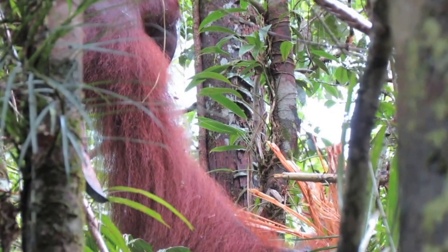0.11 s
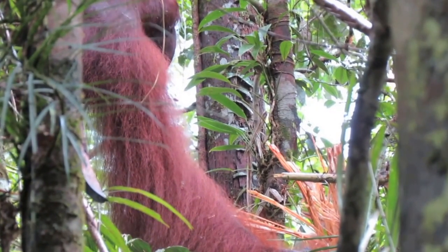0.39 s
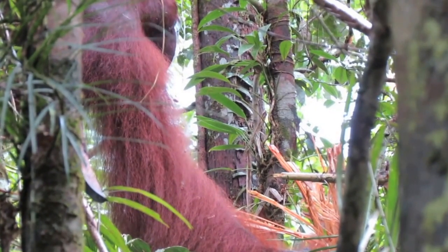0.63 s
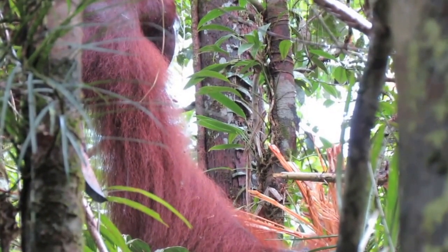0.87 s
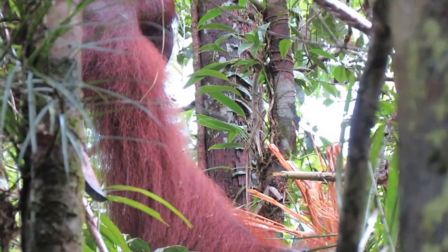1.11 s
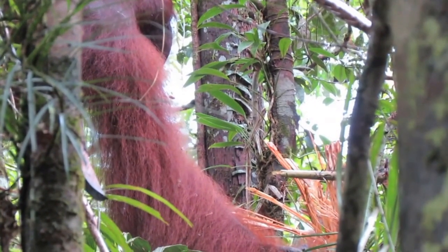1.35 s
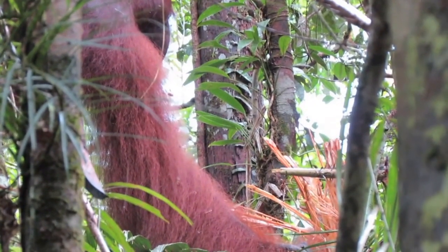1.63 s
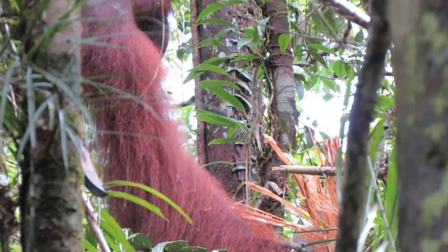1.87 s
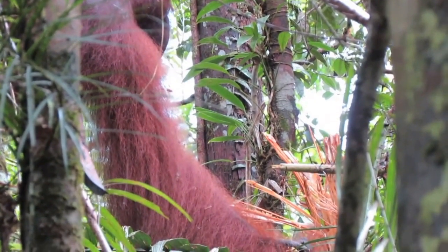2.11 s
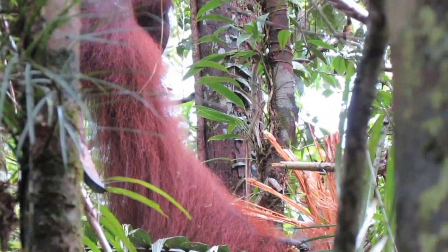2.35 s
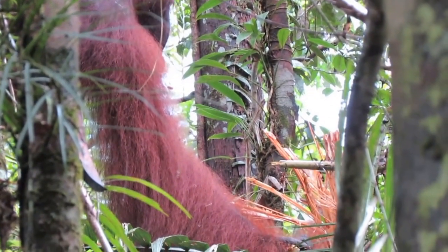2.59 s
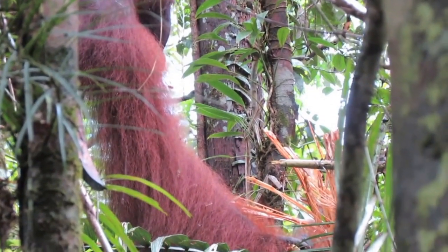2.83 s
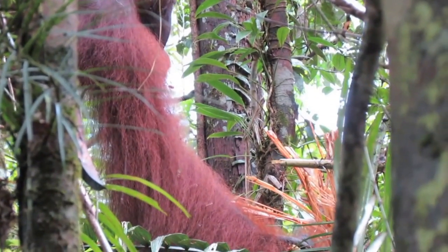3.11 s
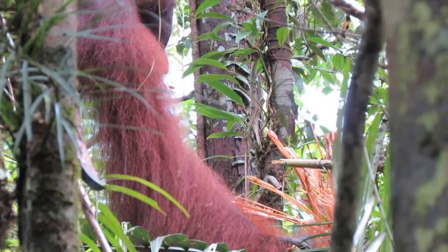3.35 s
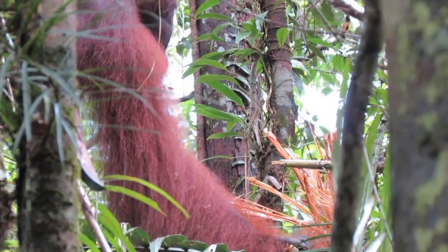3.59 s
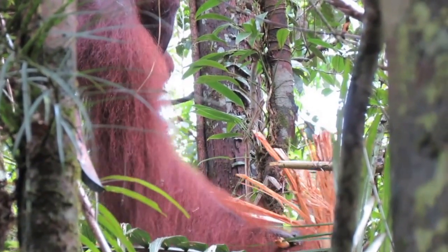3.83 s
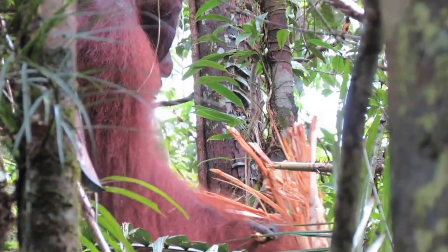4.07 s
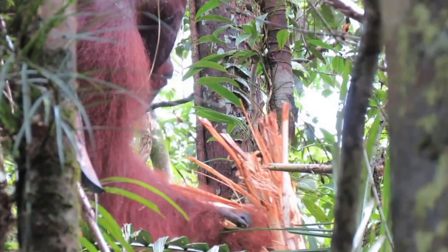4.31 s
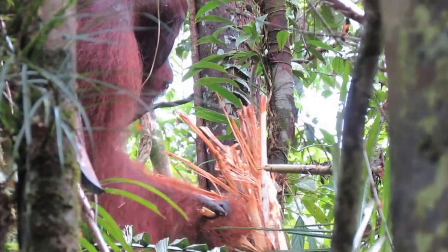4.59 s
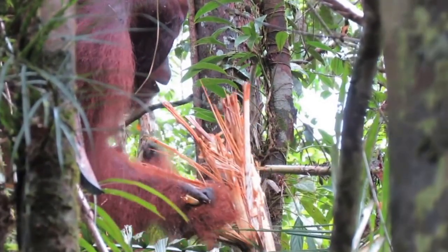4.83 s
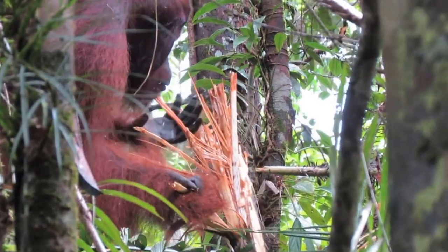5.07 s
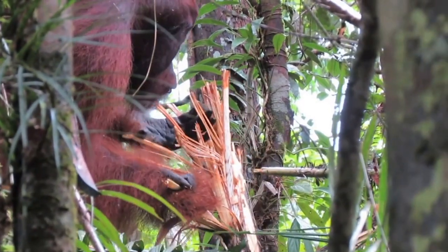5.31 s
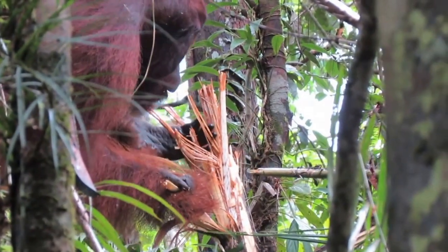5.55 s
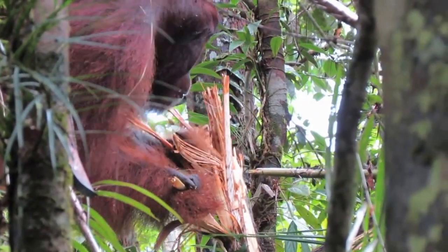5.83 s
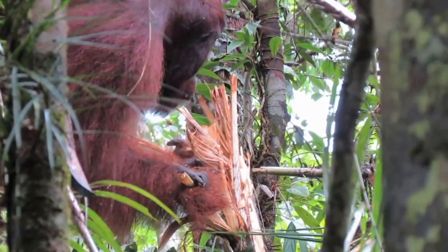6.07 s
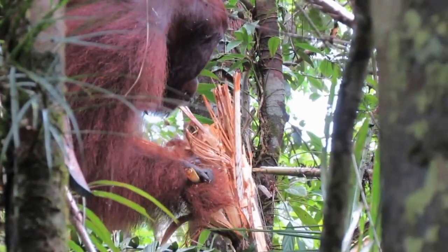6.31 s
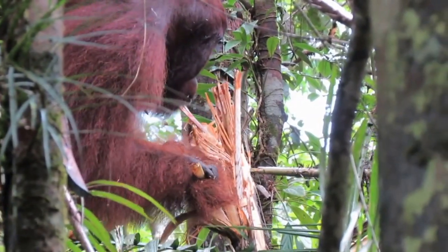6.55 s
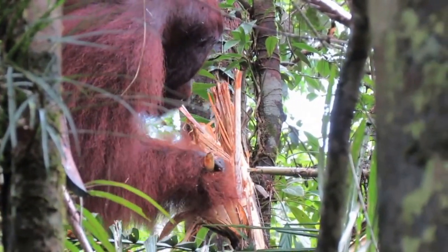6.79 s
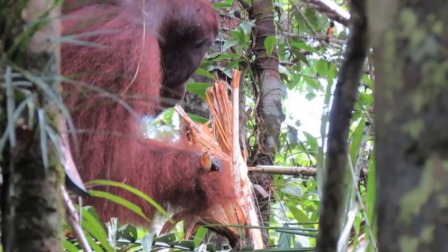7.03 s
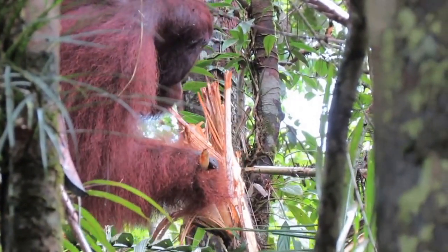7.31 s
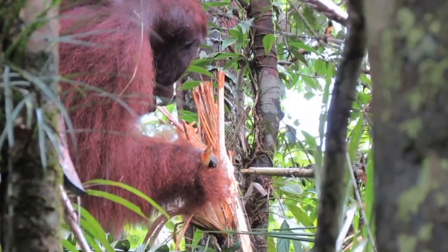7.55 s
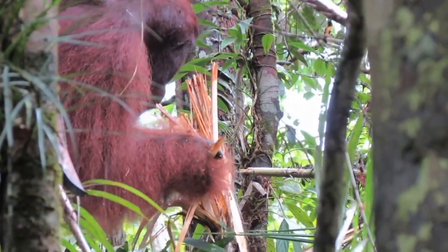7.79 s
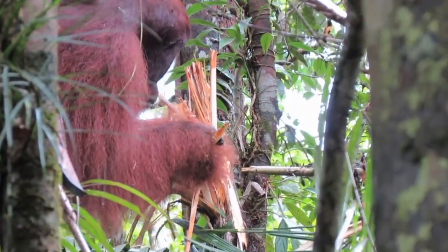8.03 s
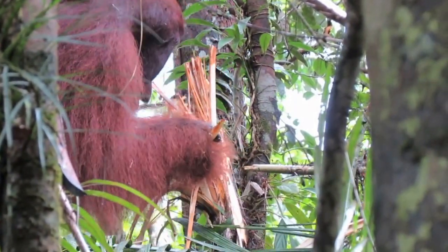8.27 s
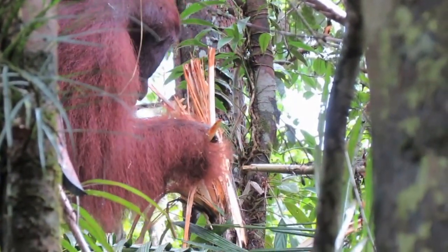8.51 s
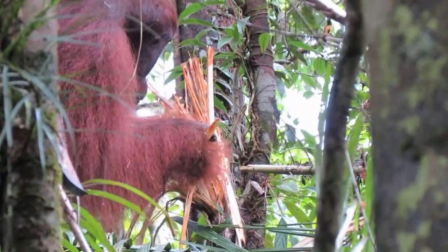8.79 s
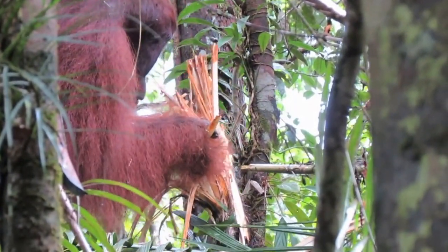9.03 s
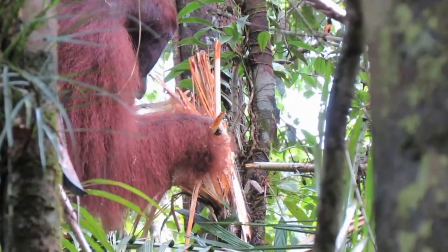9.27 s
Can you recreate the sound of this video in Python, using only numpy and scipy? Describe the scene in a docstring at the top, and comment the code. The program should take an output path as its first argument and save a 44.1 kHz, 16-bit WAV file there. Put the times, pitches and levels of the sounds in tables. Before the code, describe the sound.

Outdoors in a tropical forest, a steady shrill wall of cicadas and crickets rings wide around the microphone. Near cicadas start one after another, each throbbing whistle climbing slightly and holding. Very high chirps repeat about every two seconds. Early on, a cluster of dry fibre snaps clicks close by as an ape handles a split stem; leaves rustle softly around the middle, with one late click.

```python
"""A tropical forest by day: a few near cicadas wind their whistles up over a far chorus of many more.
Leaves scatter the songs, so tones fade and swell differently at left and right; singers are gliding sines
with echoes or narrow wandering tones, and the wash, leaves and far choruses are shaped random spectra.
An ape nearby picks at a split stem: dry fibres click and creak, and leaves rustle."""
import sys
import numpy as np
from scipy import signal
from scipy.io import wavfile
from scipy.ndimage import uniform_filter1d

SR = 44100
rng = np.random.default_rng(int(sys.argv[2]) if len(sys.argv) > 2 else 0)


def gain_from_decibels(decibels):
    """Convert decibel values to linear amplitude factors."""
    exponent = np.asarray(decibels, float) / 20
    return 10 ** exponent


def dump(signal):
    """Clip the signal to [-1, 1] and save it as 16-bit WAV at the path in sys.argv[1]."""
    limited = np.clip(np.atleast_2d(signal).T, -1, 1)
    pcm = np.round(limited * 32767).astype(np.int16)
    wavfile.write(sys.argv[1], SR, pcm)


N = 414080
T = np.arange(N) / SR
# the short-time spectra: time of each frame (s) and pitch of each bin (Hz)
FRAME_T = np.arange(N // 256 + 5) * 256 / SR
BIN_HZ = np.fft.rfftfreq(1024, 1 / SR)


def evened(x):
    """Normalisation: scales to rms 1."""
    return x / np.sqrt(np.mean(abs(x) ** 2) + 1e-20)


def read(points, hz):
    """Log-frequency interpolation of a spectrum table."""
    f, value = np.transpose(points)
    return np.interp(np.log(hz + 1), np.log(f + 1), value)


def drift(count, span):
    """Smoothed noise: slow chance of rms 1 that changes over about span samples."""
    return evened(uniform_filter1d(uniform_filter1d(rng.standard_normal(count), round(span)), round(span)))


def humps(t, rows):
    """Envelope superposition: flat-topped swells of (middle_s, half_width_s, level_db), as a factor."""
    return sum(gain_from_decibels(db) * np.exp(-((t - s) / width) ** 4) for s, width, db in rows)


def pair(z, same):
    """Interaural correlation: two unrelated draws become left and right of a given likeness (-1 to 1)."""
    same = np.clip(same, -1, 1)
    return np.array([z[0], same * z[0] + np.sqrt(1 - same ** 2) * z[1]])


def tone(hz, width_hz, same):
    """Multipath fading: a tone arrives by many leafy paths, its size and phase wandering within width_hz."""
    step = 64  # samples between path values
    count = len(hz) // step + 2
    z = rng.standard_normal((2, count)) + 1j * rng.standard_normal((2, count))
    fading = 1 / (1 + (np.fft.fftfreq(count, step / SR) / width_hz) ** 2)
    z = np.fft.ifft(np.fft.fft(z) * fading)
    at = np.arange(len(hz)) / step
    paths = np.array([np.interp(at, np.arange(count), p) for p in pair(evened(z), same)])
    carrier = np.exp(2j * np.pi * np.cumsum(hz) / SR)
    return np.sqrt(2) * (paths * carrier).real


def forest(x, direct, t60):
    """Reverberation: straight path plus trunk and leaf echoes; three sets take turns as the leaves sway."""
    t, direct = np.arange(SR // 2) / SR, np.clip(direct, 0, 1)
    echoes = rng.standard_normal((3, 2, len(t))) * gain_from_decibels(-60 * t / t60) * (t > .004)
    echoes *= np.sqrt(1 - direct) / np.linalg.norm(echoes[0, 0])
    # 1.1 turns a second; the squares of the three weights sum to 1
    turn = np.sqrt(2 / 3) * np.cos(2 * np.pi * (1.1 * T + np.arange(3)[:, None] / 3))
    scattered = signal.oaconvolve((turn * x)[:, None], echoes, axes=2).sum(0)[:, :N]
    return np.sqrt(direct) * x + scattered


def background():
    """Short-time spectral synthesis: wash, leaves and far choruses are random spectra with shared patches."""
    frames, bins = len(FRAME_T), len(BIN_HZ)
    z = 0
    for colour, swell, same in [wash(), *choruses(), wave_chorus(), leaves(), bout_chorus()]:
        re, im = rng.standard_normal((frames, bins, 2, 2)).T
        z = z + pair(re + 1j * im, same) * (colour / np.linalg.norm(colour))[:, None] * swell
    grain = rng.standard_normal((frames, bins)).T
    patches = evened(uniform_filter1d(uniform_filter1d(grain, 10, 0), 12, 1))
    # level patches of 0.84 dB rms
    return signal.istft(z * gain_from_decibels(0.84 * patches), nperseg=1024, noverlap=768)[1][:, :N]


# colour of the forest wash and the hiss of the microphone: pitch_hz, relative_density_db (per Hz)
WASH_COLOUR = [(18, -36), (30, -0.5), (80, 1.5), (300, 4), (1000, -3), (2100, -8.5), (2850, -3),
               (3100, 8.5), (3400, -4), (3600, -9), (4600, -7), (5300, 1.5), (6900, 3), (8300, -8),
               (9500, -1), (11500, -3.5), (12900, -2), (13500, -6), (16500, -27)]
# its stereo width: pitch_hz, left_right_likeness (-1 to 1)
WASH_LIKENESS = [(60, -0.83), (130, -0.7), (290, -0.79), (640, -0.56), (1410, -0.3), (3100, 0.15),
                 (6820, 0.3), (15000, -0.37)]


def wash():
    """Stationary noise: a steady layer of fixed colour whose left-right likeness varies with frequency."""
    return gain_from_decibels(read(WASH_COLOUR, BIN_HZ)), gain_from_decibels(-37.5), read(WASH_LIKENESS, BIN_HZ)[:, None]


def band_colour(low_hz, high_hz, edge_hz):
    """Band-limited spectrum: flat inside, falling exponentially outside, by a factor e every edge_hz."""
    outside = np.maximum(np.maximum(low_hz - BIN_HZ, BIN_HZ - high_hz), 0) / edge_hz
    return np.exp(-outside)


# far choruses too many to tell apart:
# low_hz, high_hz, edge_hz, left_right_likeness (clipped to -1..1), first_db, last_db, settling_s
FAR_CHORUSES = [(5675, 6657, 14, 0.19, -37.5, -36.5, 2.8), (6080, 6800, 38, 0.17, -46.5, -56, 8),
                (12310, 12645, 128, -0.21, -50.5, -40, 3.3), (5190, 5430, 63, 0.15, -44, -51.5, 2.4),
                (12702, 13122, 40, -1.3, -55, -54, 5)]


def choruses():
    """Incoherent summation: many singers fuse into bands of noise whose levels relax exponentially."""
    layers = []
    for low_hz, high_hz, edge_hz, same, first_db, last_db, settling_s in FAR_CHORUSES:
        swell = gain_from_decibels(last_db + (first_db - last_db) * np.exp(-FRAME_T / settling_s))
        layers.append((band_colour(low_hz, high_hz, edge_hz), swell, same))
    return layers


# crests of the highest chorus: crest_s, level_db
WAVE_CRESTS = [(.05, -42), (1.36, -41), (1.83, -42), (3.16, -42), (3.53, -41.5), (4.9, -40), (5.06, -42),
               (5.52, -44), (6.59, -41.5), (6.76, -43), (7.79, -41), (9.1, -45), (9.45, -41)]


def wave_chorus():
    """Asymmetric amplitude modulation: each wave of the highest chorus builds slowly and breaks off."""
    rest_db, build_db_per_s, break_db_per_s = -51, 16, 51
    waves_db = np.max([db - np.where(FRAME_T < s, build_db_per_s, break_db_per_s) * abs(FRAME_T - s)
                       for s, db in WAVE_CRESTS], axis=0)
    return band_colour(13200, 15897, edge_hz=300), gain_from_decibels(np.maximum(waves_db, rest_db)), 0


# colour of rustling leaves: pitch_hz, relative_density_db (per Hz)
LEAF_COLOUR = [(200, -12), (600, -1), (1400, 4.5), (2200, 0.5), (3800, 5), (5000, -1), (9000, -37)]
# their rustles: middle_s, half_width_s, level_db
LEAF_RUSTLES = [(.8, .4, -54.5), (4.2, .25, -52.5), (4.85, 0.53, -49), (7.9, 0.37, -56)]


def leaves():
    """Friction noise: leaves rustle in swells of coloured noise over a faint constant stir."""
    stir_db = -57
    return gain_from_decibels(read(LEAF_COLOUR, BIN_HZ)), gain_from_decibels(stir_db) + humps(FRAME_T, LEAF_RUSTLES), .1


# cicadas in a steady low cluster: pitch_hz, relative_level_db
DRONE_PARTIALS = [(3068, -7.5), (3108, -3.5), (3146, -1), (3176, -7.5), (3250, -17), (3290, -15)]
# their common effort: time_s, level_db
DRONE_EFFORT = [(0, -40), (1.1, -38.5), (2, -40.5), (4, -39), (6, -39.5), (7.6, -39), (9.39, -39)]


def drone():
    """Beating: the close lines of a steady low cicada interfere with each other."""
    lines = sum(gain_from_decibels(db) * tone(np.full(N, hz), width_hz=13.5, same=0.064) for hz, db in DRONE_PARTIALS)
    return gain_from_decibels(np.interp(T, *np.transpose(DRONE_EFFORT))) * evened(lines)


# colour of the buzzing insect: pitch_hz, relative_level_db
BUZZ_SPECTRUM = [(7800, -34), (8400, -27), (9000, -16), (9600, -2), (10300, 1), (10700, -10), (11400, -15),
                 (12000, -18)]


def buzz():
    """Harmonic comb: strong and weak pulses in turn give overtones of which every second is fainter."""
    spacing_hz, level_db = 177.5, -56
    order = np.arange(45, 68)
    order_db = read(BUZZ_SPECTRUM, order * spacing_hz) - 4.0 * (order % 2)
    return gain_from_decibels(level_db) * sum(gain_from_decibels(db) * tone(np.full(N, k * spacing_hz), width_hz=34, same=-0.59)
                               for k, db in zip(order, order_db))


# faint steady tones: pitch_hz, level_db, width_hz, left_right_likeness (-1 to 1)
FAINT_LINES = [(960, -63.5, 5.8, -0.68), (2491, -64, 21, 0.27), (3780, -63, 21, 0.27),
               (4404, -61.5, 32, -0.18), (10538, -57, 41, -0.44)]


def thin_tones():
    """Narrow-band lines: faint tones hold their mean pitch while fading blurs each to its width."""
    return sum(gain_from_decibels(db) * tone(np.full(N, hz), width_hz, same) for hz, db, width_hz, same in FAINT_LINES)


# two crickets, each repeating a falling chirp: first_s, every_s, length_s,
# from_hz and to_hz (of the first chirp), level_db (before a swell of up to 5 dB)
CRICKET_CHIRPS = [(.14, 2.015, .85, 12500, 12285, -42.5), (.1, 1.87, .71, 13110, 12925, -59)]


def crickets():
    """Frequency sweep: chirps fall, so echoes beat against them; a weak partial lies at three quarters."""
    chirp_count, creeps_hz = 5, (13, 2)  # each chirp lies this much higher than the last
    out = np.zeros(N)
    for (first, every, length, from_hz, to_hz, db), creep_hz in zip(CRICKET_CHIRPS, creeps_hz):
        for k in range(chirp_count):
            u = np.arange(round(length * SR)) / (length * SR)
            fall_hz = (from_hz - to_hz) * (1 - u) ** 1.1
            hz = to_hz + k * creep_hz + fall_hz + 10 * drift(len(u), 400)
            turns = 2 * np.pi * np.cumsum(hz) / SR
            swell = signal.windows.tukey(len(u), .14) * gain_from_decibels(db + 5 * np.sin(np.pi * u ** 1.3) ** .5)
            start = round((first + k * every) * SR)
            out[start:start + len(u)] += swell * (np.sin(turns) + gain_from_decibels(-18) * np.sin(.75 * turns))
    return forest(out, direct=.3, t60=.18)


# winding-up cicadas: turn_s (lowest point), lowest_hz, quick_climb_s, slow_climb_s
CICADAS = [(.9, 5578, .95, 3.4), (5.4, 5634, .22, 1.95), (8.23, 5615, .34, 2.8)]
# one value a cicada: full_level_db
CICADA_DB = (-38.5, -31.5, -37)
# one list a cicada, its surges and slackenings: middle_s, change_db, half_width_s
CICADA_SURGES = [
    [(1.7, 0.5, 0.31), (5.2, 3.5, 0.26)],
    [(5.85, 5, 0.47), (7.1, -2, 0.55), (7.78, 6, 0.045), (8.26, 3, 0.045), (8.78, 8, 0.07), (9.25, 2, .2)],
    [(8.6, 5.5, 0.084), (9.1, 4.5, 0.17)],
]
# what each whistle carries along: pitch_factor, shift_hz, relative_level_db, throb_db (up and down)
CICADA_PARTS = [(1, 0, 3, 3), (1, 45, -10, 3), (1, 88, -7, 3), (.375, 0, -34, 4), (.75, 0, -36, 4),
                (.8, 0, -28, 9)]


def whistlers():
    """Frequency and amplitude modulation: each cicada slides up, warbling and throbbing as its belly pumps."""
    top_hz, slow_hz = 5880, 150  # where every whistle is heading; the part of the climb that is slow
    throb_hz, warble, jitter = 13.3, .0036, .0014  # mean pump rate; pitch swing and random drift as shares
    # a faint lead-in sinks to the lowest point, growing
    sag_hz_per_s, lead_s, lead_db_per_s = 220, .55, 30
    soft_db, swell_s, waver_db = 6, 0.36, 0.5  # soft at the turn, then full, wavering
    out = np.zeros(N)
    for (turn, low_hz, quick, slow), db, surges in zip(CICADAS, CICADA_DB, CICADA_SURGES):
        surge_db = sum(d * np.exp(-((T - s) / width) ** 2) for s, d, width in surges)
        on = slice(round((turn - lead_s) * SR), N)
        after, before = np.maximum(T[on] - turn, 0), np.maximum(turn - T[on], 0)
        quick_gap_hz = (top_hz - slow_hz - low_hz) * np.exp(-(after / quick) ** 1.4)
        slow_gap_hz = slow_hz * np.exp(-after / slow)
        hz = top_hz - quick_gap_hz - slow_gap_hz + sag_hz_per_s * before
        pump = 2 * np.pi * np.cumsum(throb_hz * (1 + 0.039 * drift(len(hz), 5000))) / SR
        level_db = (db - soft_db * np.exp(-after / swell_s) - lead_db_per_s * before + surge_db[on]
                    + waver_db * drift(len(hz), 3300))
        level = gain_from_decibels(level_db) * np.minimum((lead_s - before) / 0.12, 1)
        for factor, shift_hz, part_db, throb_db in CICADA_PARTS:
            # every part swings by about the same number of hertz
            swing = hz * (warble * np.sin(pump) + jitter * drift(len(hz), 876))
            turns = 2 * np.pi * np.cumsum(factor * hz + shift_hz + swing) / SR
            out[on] += gain_from_decibels(part_db + throb_db * np.cos(pump)) * level * np.sin(turns)
    return forest(out, direct=.42, t60=.4)


# fibres snapping: start_s, ring_level_db, ring_hz, left_over_right_db, crack_db (noise gain over the ring)
FIBRE_SNAPS = [(0.478, -35.5, 1190, -18, 4), (0.615, -43, 1400, 3, 14), (0.768, -46, 1320, -0.5, 5),
               (0.785, -39, 1400, -0.5, 4), (0.843, -47, 2120, -1.0, 9), (0.855, -46, 947, -13, 15),
               (0.867, -42, 1190, -2.0, 5), (0.877, -48, 821, -1.0, 12), (0.9, -40, 870, -6, 6),
               (0.921, -38, 2120, -7, 11.5), (0.959, -40, 1550, -3, 13.5), (1.01, -39, 1120, -3, 6),
               (1.027, -46, 1710, 1.0, 8), (1.216, -39.5, 1130, -6, 3), (1.687, -40, 1490, -2.0, 8),
               (7.48, -40.5, 1540, -1.5, 9)]


def snaps():
    """Impulsive excitation: a sharp wideband crack, a short woody ring and a little scattered tail."""
    out, t = np.zeros((2, N + 4000)), np.arange(4000) / SR
    band = signal.butter(2, [500, 6000], "band", fs=SR)
    for s, db, hz, pan_db, crack_db in FIBRE_SNAPS:
        noise = signal.lfilter(*band, rng.standard_normal((2, 4000)))
        # each part falls 60 dB in the seconds given
        ring = np.sin(2 * np.pi * hz * t) * gain_from_decibels(-60 * t / 0.015)
        sharp = noise[0] * gain_from_decibels(-60 * t / 0.0098)
        tail = 0.26 * noise * gain_from_decibels(-60 * t / 0.11)
        sides = gain_from_decibels(db + pan_db * np.array([[.5], [-.5]]))
        out[:, round(s * SR):][:, :4000] += sides * (ring + gain_from_decibels(crack_db) * (sharp + tail))
    return out[:, :N]


# bouts of a narrow chorus: middle_s, half_width_s, level_db
CHORUS_BOUTS = [(2.05, 0.77, -47), (4.9, .45, -44), (8, .6, -54)]


def bout_chorus():
    """Gated narrow-band noise: a chorus in a slim band sings in bouts."""
    return band_colour(5400, 5490, edge_hz=20), humps(FRAME_T, CHORUS_BOUTS), .3


# a fibre creaking: start_s, end_s, from_hz and to_hz (slips a second), level_db
FIBRE_CREAK = (4.09, 4.23, 222, 204, -58)
# its overtones: order, relative_level_db
CREAK_OVERTONES = [(2, 0), (5, 0), (6, -2), (7, -7), (8, -5)]


def creak():
    """Stick-slip: even slips of the fibres give a short falling stack of overtones."""
    start, end, from_hz, to_hz, db = FIBRE_CREAK
    u = np.clip((T - start) / (end - start), 0, 1)
    turns = np.cumsum(from_hz + (to_hz - from_hz) * u) / SR
    stack = sum(gain_from_decibels(order_db) * np.sin(2 * np.pi * k * turns) for k, order_db in CREAK_OVERTONES)
    return gain_from_decibels(db) * np.sin(np.pi * u) ** .6 * stack


def scene():
    """Superposition: all singers, the forest and the ape's picking add up."""
    singers = drone() + buzz() + thin_tones() + crickets() + whistlers()
    return background() + singers + snaps() + creak()


def top_cut(x):
    """Nothing passes above the cut-off."""
    return signal.sosfilt(signal.butter(12, 16500, fs=SR, output="sos"), x)


def record(dry):
    """Band limitation: a steep low-pass at 15690 Hz finishes the mix."""
    low_pass = signal.firwin(511, 15690, window=("kaiser", 9), fs=SR)
    limited = signal.oaconvolve(dry, low_pass[None], "same")
    return top_cut(limited)


dry = scene()
out = record(dry)
dump(out)
```